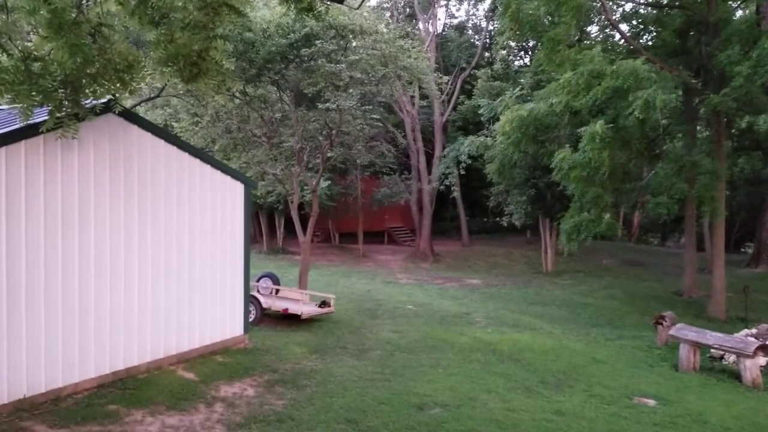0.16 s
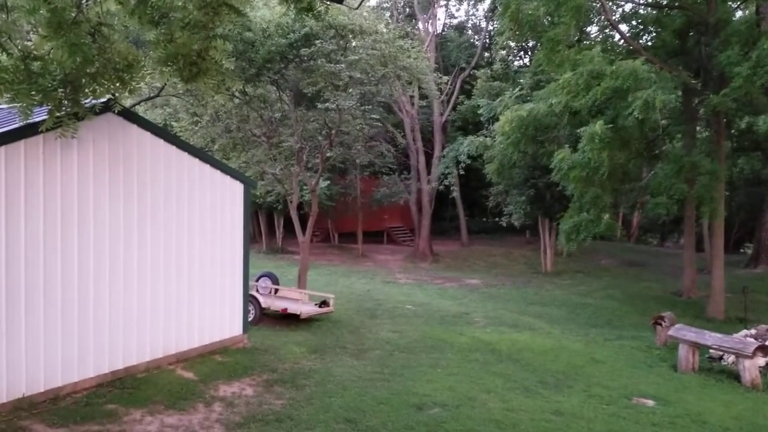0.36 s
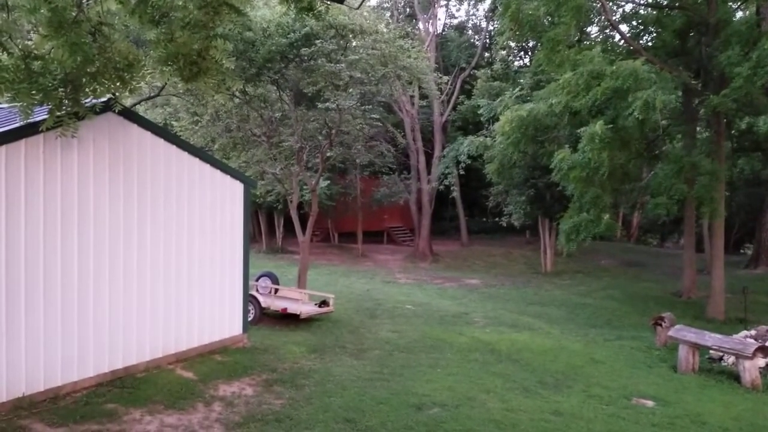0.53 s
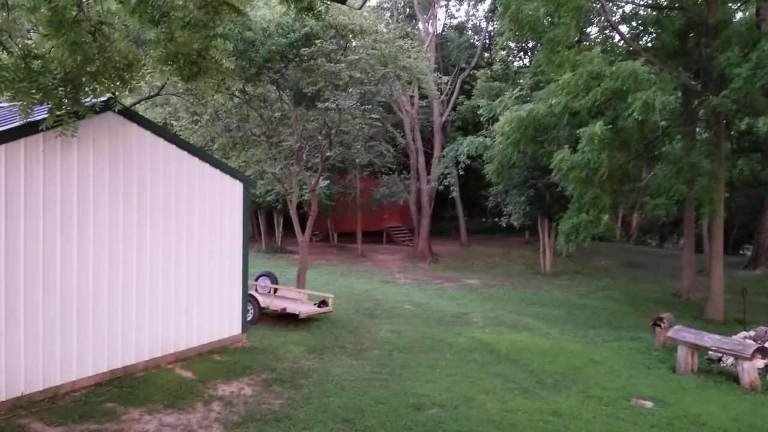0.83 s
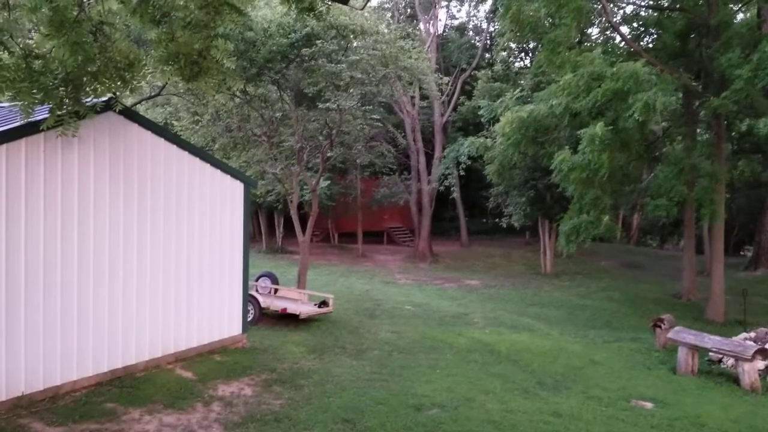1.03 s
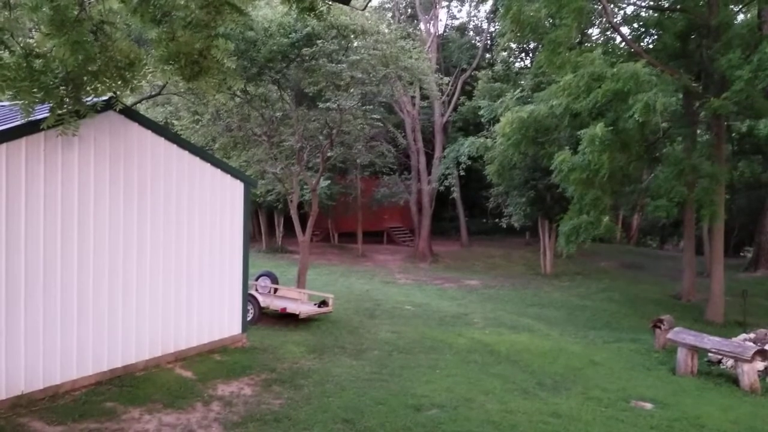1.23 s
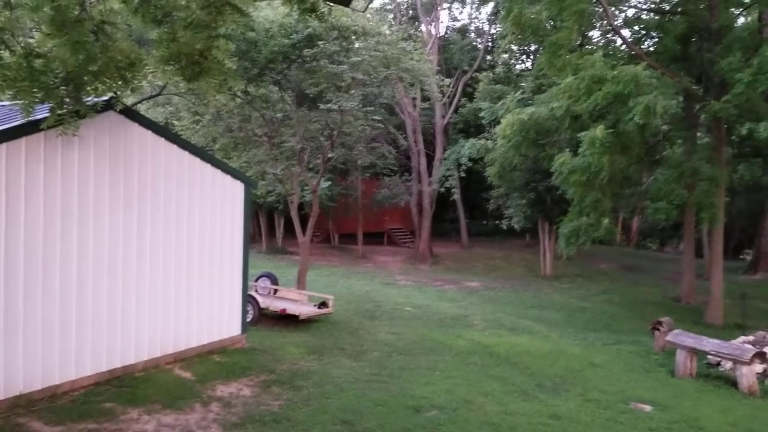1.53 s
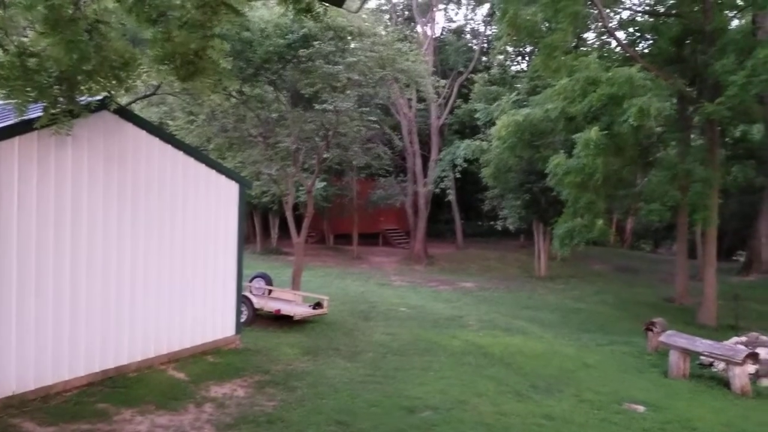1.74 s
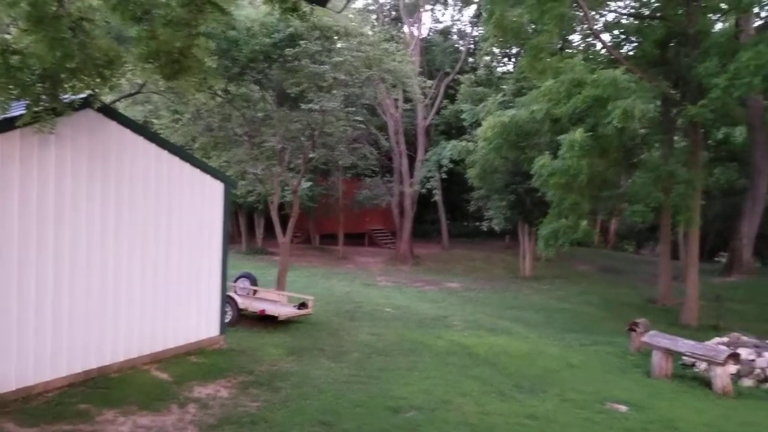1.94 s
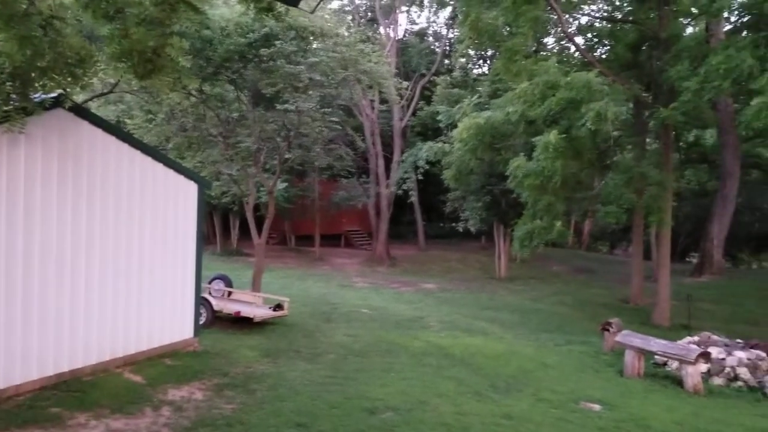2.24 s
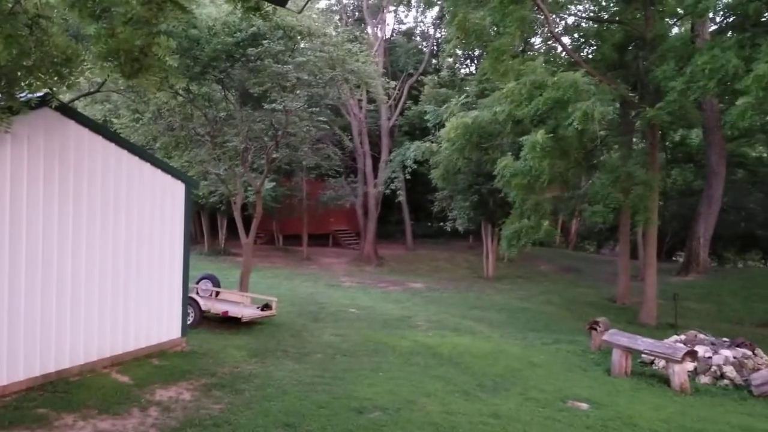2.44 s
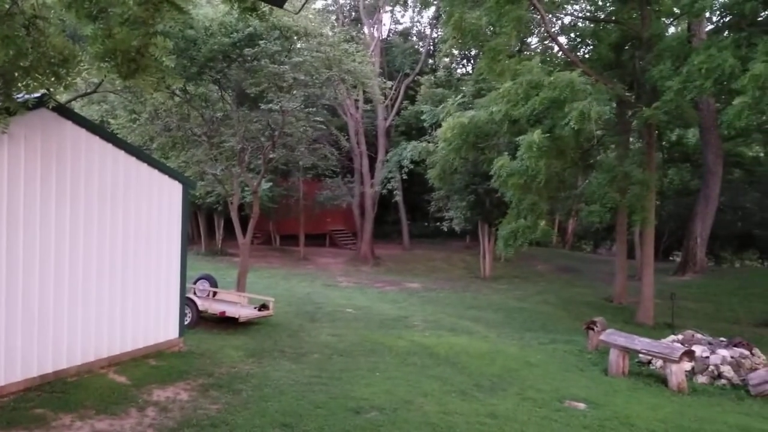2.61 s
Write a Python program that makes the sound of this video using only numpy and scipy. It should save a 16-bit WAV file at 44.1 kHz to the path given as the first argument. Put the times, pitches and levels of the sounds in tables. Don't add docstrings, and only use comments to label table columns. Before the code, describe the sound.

Cicadas ring in a steady shrill wash, slowly easing, while a far cuckoo-like bird calls repeatedly

```python
import sys
import numpy as np
from scipy import signal
from scipy.fft import rfft, irfft, next_fast_len
from scipy.io import wavfile

SR = 44100
rng = np.random.default_rng(int(sys.argv[2]) if len(sys.argv) > 2 else 0)


def pcm_store(signal):
    levels = np.round(np.clip(np.atleast_2d(signal), -1, 1) * 32767)
    wavfile.write(sys.argv[1], SR, levels.astype(np.int16).T)


def convert_level_to_amplitude(level_db):
    exponent = np.asarray(level_db, float) / 20
    return 10 ** exponent


N = 122157
SIZE = next_fast_len(N + SR // 2)
HZ = np.maximum(np.arange(SIZE // 2 + 1) * SR / SIZE, 1)
TIME = np.arange(N) / SR

# f/Hz, level/dB
AIR_COLOUR = [(150, -3), (200, -0.6), (350, -2), (420, -6), (600, -7.5), (900, -6.5), (1400, -3.5)]
AIR_DB, AIR_ALIKE = -84, 0.16
# f/Hz, level/dB
TRAFFIC_COLOUR = [(12, -37), (20, -15), (64, 0), (129, 1), (146, 0), (179, -18), (260, -28), (340, -41),
                  (570, -120)]
# t/s, level/dB
TRAFFIC_SWELL = [(0.0, -69), (0.77, -72), (1.93, -67), (2.71, -68), (2.77, -61)]
TRAFFIC_ALIKE = 0.8

WHISTLE_S, WHISTLE_LEN_S = 2.122, .082
WHISTLE_HZ, WHISTLE_DB, WHISTLE_LEAN_DB = 1750, -58, -13

# t/s, knock level/dB, wait to first note/s, first note level/dB, second note level/dB
CALLS = [(.447, -61.5, 0.063, -66, -67.5), (.835, -60, 0.061, -63, -65), (1.184, -60.5, 0.048, -66, -63.5),
         (1.514, -60.5, 0.051, -62, -74), (1.745, -59.5, 0.053, -60, -77),
         (1.968, -60.5, 0.037, -61.5, -68), (2.188, -57.5, 0.043, -61, -76),
         (2.403, -59.5, 0.048, -61.5, -75), (2.613, -59.5, 0.047, -61, -78)]
# delay/s, f/Hz, length/s, level/dB, left-right/dB
KNOCK_PIPS = [
    (0, 2230, .022, 3, 9),
    (.004, 2080, .028, 2.5, 7),
    (.01, 1930, .028, .1, 5),
    (.016, 1780, .03, -2.5, 2.5),
    (.02, 1600, .035, -4, .1),
    (.003, 1150, .022, -11, 5),
]
# delay/s, f/Hz, length/s, level/dB, left-right/dB
NOTE_PIPS = [
    (0, 1151, .02, -1.5, 9.5),
    (0.016, 1021, 0.031, 1.3, -4),
    (0.036, 940, .022, -1, 4),
]
SECOND_S, TAIL_S, TAIL_HZ, TAIL_DB = .07, 0.082, 967, -1.5
PIP_FALL, PIP_RASP, PITCH_SPREAD = .05, .8, .01
WOODS_T60_S, WOODS_DB = .24, .1

# t/s, level/dB
CHORUS_EFFORT = [(0.0, -34), (0.8, -34.5), (0.83, -35), (1.53, -36.5), (1.54, -39.5), (1.57, -36),
                 (1.64, -38), (2.75, -38.5), (2.77, -40)]
# f/Hz, level/dB
SONG_COLOUR = [(2600, -34), (3000, -14.5), (3300, -8), (4400, 0.22), (5500, -7), (6500, -9.5), (7500, -18),
               (7700, -23.5), (8300, -40)]
# f/Hz, level/dB
SKIRT_COLOUR = [(1250, -47), (1450, -22.5), (1650, -14), (2000, -11.5), (2400, -7), (2750, -5.5)]
SKIRT_DB, SKIRT_FOLLOWS = -66.5, .7
# f/Hz, level/dB
SHIMMER_COLOUR = [(8000, -4.5), (8600, -6), (10300, -4), (11700, -3.5), (12500, -0.1), (14000, -1.1),
                  (15720, -1), (15790, -32)]
SHIMMER_DB, SHIMMER_FOLLOWS = -54, 0.82
# f/Hz, left-right/dB
LEFT_LEAN = [(900, 13), (1500, 18), (2800, 2), (5700, 3), (7300, 9), (9300, -4.8), (11800, 3.5),
             (14500, 8.5)]
# f/Hz, width/Hz, left level/dB, right level/dB
SINGER_GROUPS = [(3090, 130, 3.5, 1.5), (3817, 190, 2, 2), (3855, 55, -2, -3), (4726, 217, 2.5, 3.2),
                 (5355, 130, 4, -1.5), (5370, 380, -0.5, 2.5), (5830, 150, 4.5, 2.5), (6090, 116, 5, 3.5),
                 (7020, 175, 4, 5), (7530, 38, 2, 2)]
# f/Hz, level/dB, left-right/dB
NEAR_DRONES = [(4067, -54, -7), (3352, -59, 5), (3489, -59, 1.5), (4544, -59, 5), (4275, -60, 2.5),
               (6085, -62, 5), (5340, -61, 1.5), (7525, -72, -1.5)]
DRONE_WIDTH_HZ = 8
CLICKS_LOW_HZ, CLICKS_HIGH_HZ, CLICK_JITTER_S, RATE_WANDER = 129.8, 259.17, .00002, .002
BODY_WIDTH_OCT, SWELL_DB, FAR_SHARE, CROWN_T60_S = .16, 3.5, .62, .3
CORE_HZ, CORE_WIDTH_HZ, CORE_TIRES_PER_DB = 4400, 540, 0.0272


def rms_one(x):
    return x / np.sqrt(np.mean(x ** 2) + 1e-20)


def at_hz(points):
    hz, db = np.array(points).T
    return np.interp(np.log(HZ), np.log(hz), db)


def colour(points):
    below_oct = np.maximum(np.log2(points[0][0] / HZ), 0)
    above_oct = np.maximum(np.log2(HZ / points[-1][0]), 0)
    return convert_level_to_amplitude(at_hz(points) - 90 * (below_oct + above_oct))


def sides(db):
    return convert_level_to_amplitude(np.multiply.outer([.5, -.5], db))


def drift(rate_hz):
    knots = rng.standard_normal(200)
    return np.interp(TIME * rate_hz, np.arange(len(knots)), knots)


def scatter(t60):
    t = np.arange(SR // 2) / SR
    tail = rng.standard_normal((2, len(t))) * convert_level_to_amplitude(-60 * t / t60)
    energy = np.sum(tail ** 2, axis=1, keepdims=True)
    return rfft(tail / np.sqrt(energy), SIZE)


def hiss(points, alike):
    mid, side = rfft(rng.standard_normal((2, SIZE)))
    alike = np.clip(alike, 0, 1)
    opposite = side * [[1], [-1]]
    return colour(points) * (np.sqrt(1 + alike) * mid + np.sqrt(1 - alike) * opposite)


def heard(spectrum):
    return rms_one(irfft(spectrum, SIZE)[..., :N])


def air():
    return convert_level_to_amplitude(AIR_DB + 5.5) * heard(hiss(AIR_COLOUR, AIR_ALIKE))


def traffic():
    swell_db = np.interp(TIME, *np.transpose(TRAFFIC_SWELL))
    return convert_level_to_amplitude(swell_db) * heard(hiss(TRAFFIC_COLOUR, TRAFFIC_ALIKE))


def whistle():
    t = np.clip((TIME - WHISTLE_S) / WHISTLE_LEN_S, 0, 1)
    pitch_hz = WHISTLE_HZ * (1 - .05 * np.exp(-14 * t) + .007 * drift(60))
    tone = np.sin(2 * np.pi * np.cumsum(pitch_hz) / SR)
    shape = np.sin(np.pi * t) ** .5
    return convert_level_to_amplitude(WHISTLE_DB + 2 * drift(65)) * shape * tone * sides([WHISTLE_LEAN_DB])


def add_pips(out, start, db, pips):
    for delay, hz, length, pip_db, lean_db in pips:
        t = np.arange(int(length * SR)) / SR
        at = int((start + delay) * SR)
        pitch, strength, *grain = rng.standard_normal(42)
        rasp = 1 + PIP_RASP * np.interp(t * hz * 0.405, np.arange(len(grain)), grain)
        fall = 1 + PIP_FALL * (.5 - .5 * t / length)
        cycles = hz * (1 + PITCH_SPREAD * pitch) * t * fall
        shape = np.sin(np.pi * (t / length) ** 0.59)
        pip = shape * rasp * np.sin(2 * np.pi * cycles)
        out[:, at:at + len(t)] += convert_level_to_amplitude(db + pip_db + 1.14 * strength) * sides([lean_db]) * pip


def cuckoo():
    out = np.zeros((2, N + SR))
    tail_pip = [(0.0024, TAIL_HZ, 0.018, TAIL_DB, 3.0)]
    for s, knock_db, wait, note_db, second_db in CALLS:
        add_pips(out, s, knock_db, KNOCK_PIPS)
        add_pips(out, s + wait, note_db, NOTE_PIPS)
        add_pips(out, s + wait + SECOND_S, second_db, NOTE_PIPS)
        add_pips(out, s + wait + TAIL_S, note_db, tail_pip)
    return out[:, :N]


def birds_in_woods():
    tune = whistle()
    birds = cuckoo() + .4 * tune
    echoes = irfft(rfft(birds, SIZE) * scatter(WOODS_T60_S), SIZE)[:, :N]
    return convert_level_to_amplitude(-4.5) * (birds + convert_level_to_amplitude(WOODS_DB) * echoes + .6 * tune)


def swarm(count):
    total, power = 0, 1e-9
    for body_hz in np.geomspace(1300, 16000, count):
        rate = rng.uniform(CLICKS_LOW_HZ, CLICKS_HIGH_HZ) * (1 + RATE_WANDER * drift(1.5))
        at = np.flatnonzero(np.diff(np.floor(np.cumsum(rate) / SR + rng.random())))
        jitter = CLICK_JITTER_S * SR * rng.standard_normal(2000)[:len(at)]
        at = np.clip(at + jitter.round().astype(int), 0, N - 1)
        clicks = np.zeros(N)
        clicks[at] = convert_level_to_amplitude(SWELL_DB * drift(4.64))[at]
        body = np.exp(-.5 * (np.log2(HZ / body_hz) / BODY_WIDTH_OCT) ** 2)
        total = total + rfft(rms_one(clicks), SIZE) * body * scatter(CROWN_T60_S)
        power = power + body ** 2
    near = total / np.sqrt(power)
    far = rfft(rng.standard_normal((2, SIZE)))
    share = np.clip(FAR_SHARE, 0, 1)
    return np.sqrt(1 - share) * near + np.sqrt(share) * far


def near_drones(fall_db):
    out = np.zeros((2, N))
    for hz, db, lean_db in NEAR_DRONES:
        resonance = 1 + (2 * (HZ - hz) / DRONE_WIDTH_HZ) ** 2
        line = heard(rfft(rng.standard_normal((2, SIZE))) / resonance)
        out += convert_level_to_amplitude(db + fall_db + 2 * drift(4.4)) * sides([lean_db]) * line
    return out


def cicadas():
    effort_db = np.interp(TIME, *np.transpose(CHORUS_EFFORT))
    fall_db = effort_db - CHORUS_EFFORT[0][1]
    flat = swarm(count=44) * sides(at_hz(LEFT_LEAN))
    group_db = 0
    for hz, width, *db in SINGER_GROUPS:
        group_db = group_db + np.outer(db, np.exp(-2 * ((HZ - hz) / width) ** 2))
    out = convert_level_to_amplitude(effort_db + 3) * heard(flat * colour(SONG_COLOUR) * convert_level_to_amplitude(group_db))
    core_band = np.exp(-.5 * ((HZ - CORE_HZ) / CORE_WIDTH_HZ) ** 2)
    core = irfft(rfft(out, SIZE) * core_band, SIZE)[:, :N]
    out += CORE_TIRES_PER_DB * (fall_db - fall_db.mean()) * core
    skirt_db = SKIRT_DB + 3.5 + SKIRT_FOLLOWS * fall_db + drift(6.55)
    out += convert_level_to_amplitude(skirt_db) * heard(flat * colour(SKIRT_COLOUR))
    shimmer_db = SHIMMER_DB + 3 + SHIMMER_FOLLOWS * fall_db
    out += convert_level_to_amplitude(shimmer_db) * heard(flat * colour(SHIMMER_COLOUR))
    return out + near_drones(fall_db)


def scene():
    return air() + traffic() + birds_in_woods() + cicadas()


def top_cut(x):
    return signal.sosfilt(signal.butter(12, 15840, fs=SR, output="sos"), x)


def record(dry):
    return top_cut(dry)


dry = scene()
out = record(dry)
pcm_store(out)
```